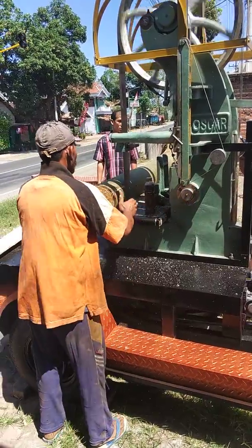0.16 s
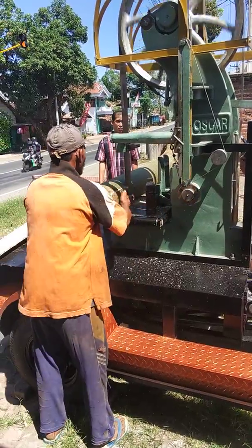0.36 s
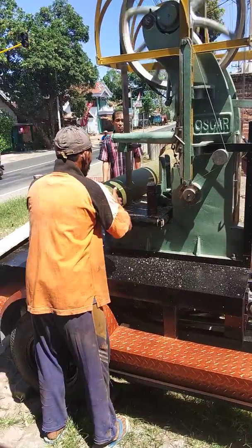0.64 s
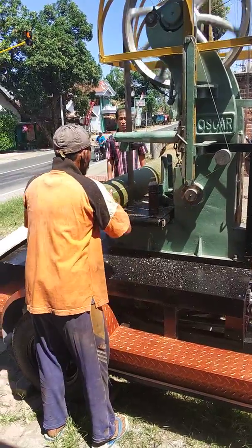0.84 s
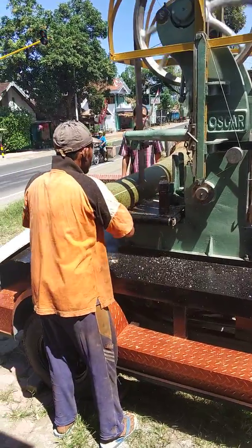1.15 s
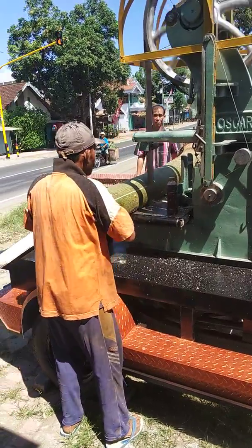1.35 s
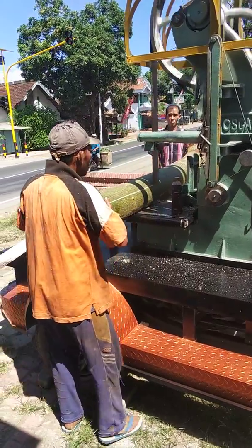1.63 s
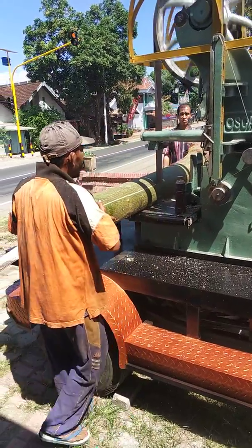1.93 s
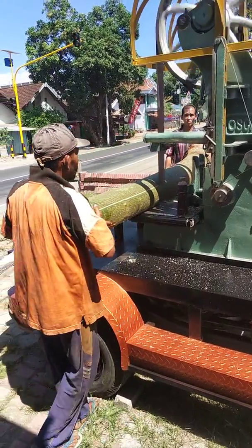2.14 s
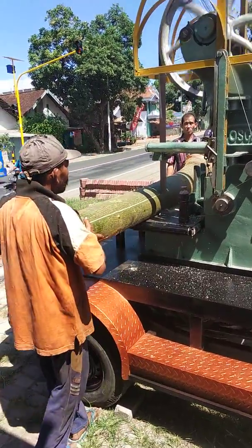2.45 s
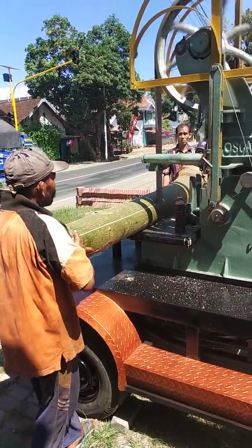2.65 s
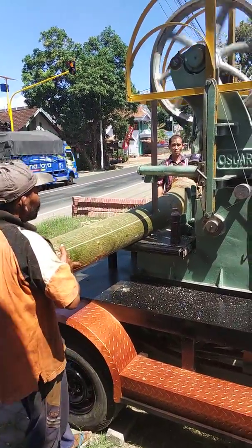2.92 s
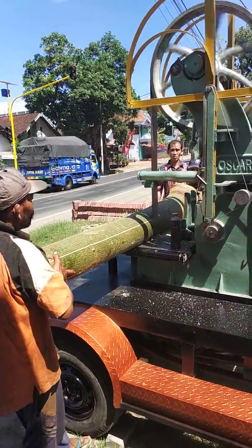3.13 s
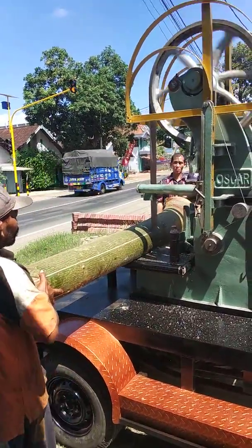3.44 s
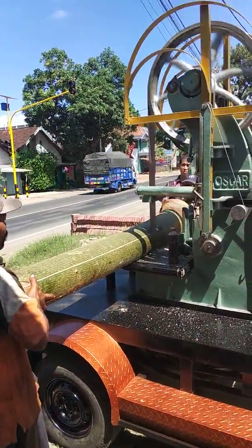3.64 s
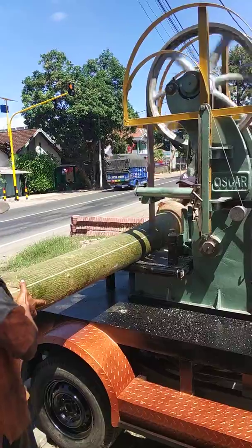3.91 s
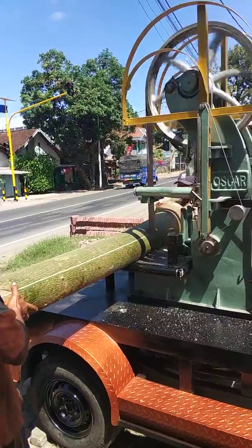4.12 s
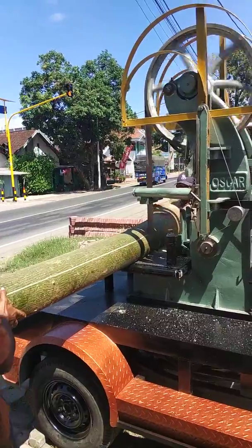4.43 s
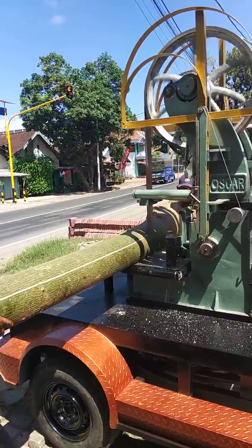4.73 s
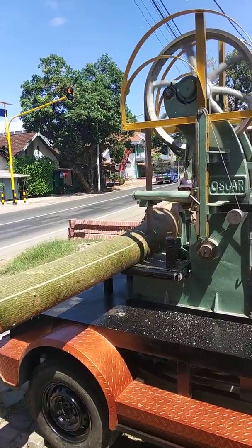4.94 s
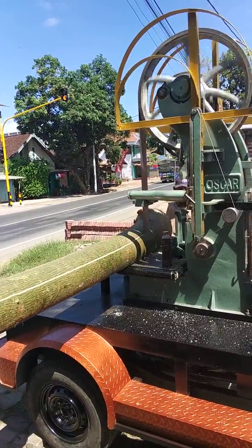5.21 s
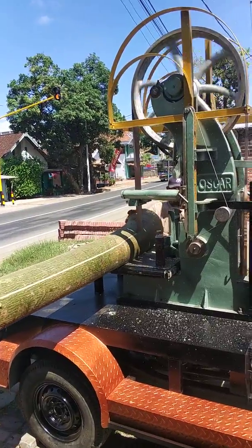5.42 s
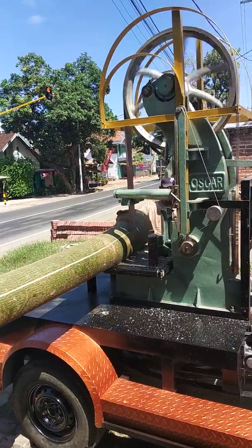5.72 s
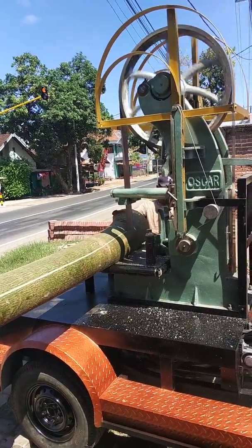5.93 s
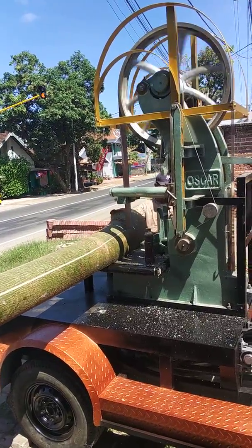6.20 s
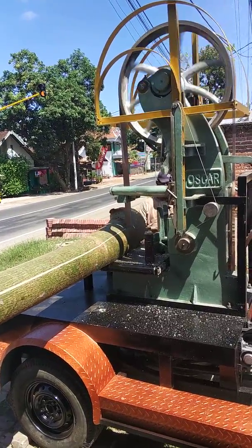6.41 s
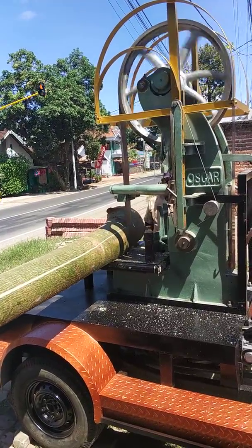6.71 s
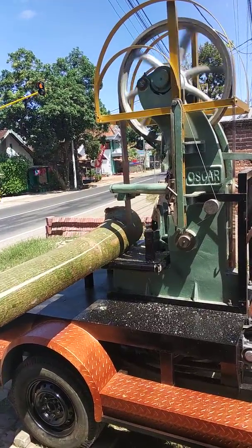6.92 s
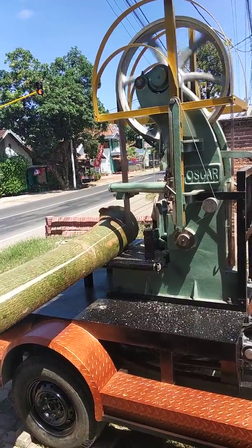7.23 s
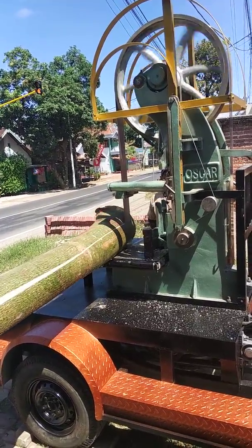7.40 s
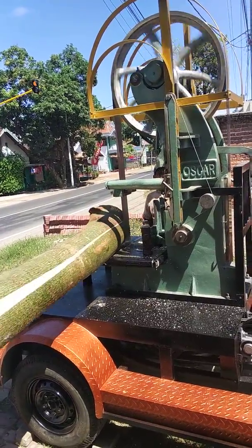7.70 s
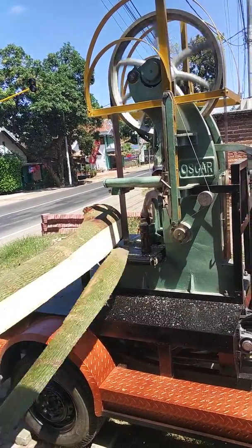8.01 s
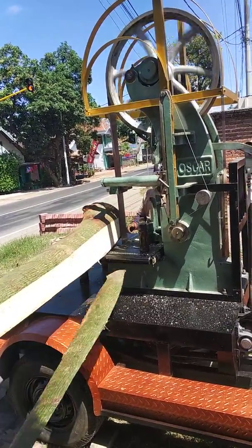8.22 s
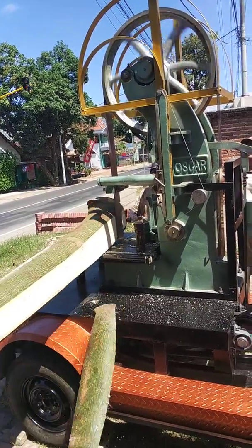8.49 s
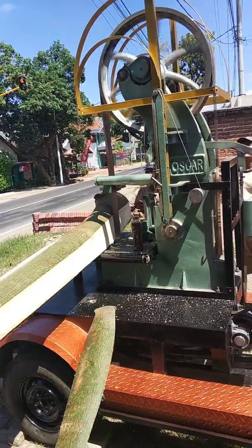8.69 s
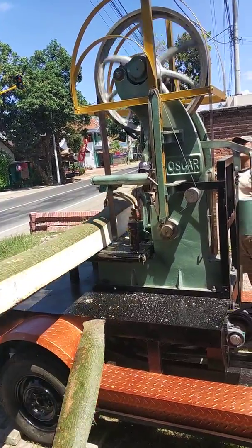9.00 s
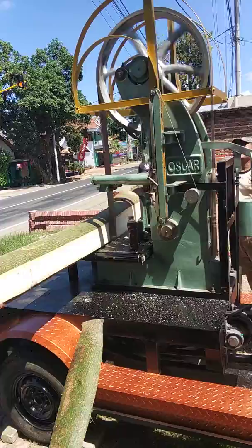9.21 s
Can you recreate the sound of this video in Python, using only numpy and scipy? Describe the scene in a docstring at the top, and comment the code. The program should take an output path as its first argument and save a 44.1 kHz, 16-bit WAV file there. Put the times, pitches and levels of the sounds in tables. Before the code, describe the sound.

A mobile band sawmill rips through a log outdoors, a chugging single-cylinder diesel under a harsh, ringing, hissing rasp of cutting steel.

```python
"""A mobile band sawmill rips a log close to a microphone, for a little over nine seconds.
From the start a single-cylinder diesel chugs ten times a second: pulses excite ducts, blows ring the block.
Wavering lines hum faintly. The diesel drives the band: torn noise rasps, rings, sizzles; tooth pulses whine.
From two seconds on the teeth now and then snatch at tougher wood, and bursts of noise bark in the log.
Near the end the slab comes free: the bite of the teeth drops, the band rubs on and the engine speeds up."""
import sys
import numpy as np
from scipy import signal
from scipy.fft import rfft, irfft, next_fast_len
from scipy.io import wavfile
from scipy.ndimage import uniform_filter1d

SR = 44100
rng = np.random.default_rng(int(sys.argv[2]) if len(sys.argv) > 2 else 0)


def waveform_to_disk(signal):
    """Save audio, clipped to [-1, 1], as 16-bit WAV at the path in sys.argv[1]."""
    frames = np.transpose(np.atleast_2d(signal))
    scaled = np.clip(frames, -1, 1) * 32767
    samples = np.round(scaled).astype(np.int16)
    wavfile.write(sys.argv[1], SR, samples)


N = 412335
TIME = np.arange(N) / SR  # s

# Engine speed, rising when the cut is through: time_s, firing_rate_hz
ENGINE_SPEED = [(0, 10.042), (1.3, 9.992), (3.3, 10.014), (5.2, 10.009), (5.9, 9.972), (6.7, 10.02),
                (7.6, 9.973), (8.5, 10.128), (9.35, 10.138)]
# Gas pulses of exhaust and intake in each cycle: delay_ms after ignition, relative_level_db,
# duct_resonance_hz, width_hz
GAS_PULSES = [(1, -14.5, 201, 69), (10.9, -9, 363, 240), (15.5, -10.5, 555, 150), (30.38, -4, 205, 86),
              (52.52, 1, 243, 203), (56.24, -5, 330, 360), (60.7, -13, 435, 140), (79.46, -6, 240, 205)]
# Loudness of the gas pulses, greatest under the deepest load: time_s, level_db
CHUG_LEVEL = [(0, -32.5), (2.2, -32.5), (6.3, -30.5), (9.35, -31.5)]
# Blows of combustion, piston and valves in each cycle: delay_ms after ignition, relative_level_db
ENGINE_BLOWS = [(2, -2.5), (4.5, -4.5), (9, -6), (13, -1), (22, -4), (37, -3), (50, -21), (60, -13)]
# Loudness of the diesel knock: time_s, crankcase_db, block_db, loose_covers_db
KNOCK_LEVEL = [(0, -31, -33, -29), (1.5, -30.5, -30.5, -33.5), (2.4, -28.5, -31.5, -30),
               (3.2, -34, -31, -32), (4.1, -30.5, -34, -32), (5.5, -34.5, -28.5, -29.5),
               (6.3, -32.5, -27.5, -34), (7, -33.5, -28.5, -38), (7.9, -35.5, -30.5, -28),
               (9.35, -38, -34, -29)]
# Resonances of the long-ringing crankcase: centre_hz, width_hz, relative_gain_db
CRANKCASE_MODES = [(795, 23, 2.5), (838, 16, -2), (895, 27, 2)]
# Resonances of engine block and covers: centre_hz, width_hz, relative_gain_db
BLOCK_MODES = [(440, 34, 0), (564, 46, -5), (624, 40, -8), (930, 41, -1), (997, 77, 2.5), (1094, 37, -9),
               (1208, 32, 0), (1290, 43, 4), (1430, 73, -6), (1720, 40, 0), (2050, 250, -2),
               (2970, 1100, -10.5), (4520, 1600, -16)]
# Spectrum of the clattering covers: frequency_hz, relative_gain_db
CLATTER_SPECTRUM = [(300, -9), (800, -8), (1300, 2.5), (1600, -13), (2300, 7), (3500, -1.5), (5500, -4),
                    (10000, -38.5)]
# Faint wavering lines of the running machine, with the tooth-passing tone at 730 Hz:
# mean_pitch_hz, relative_level_db
HUM_LINES = [(430, -43), (550, -45.5), (636, -43), (730, -51), (845, -42), (1082, -49), (1230, -45)]
# The cut, louder once the slab comes free and the band rubs on: time_s, relative_rasp_db, relative_ring_db
CUT_LEVEL = [(0.05, -22.5, -22), (0.62, -21, -21.5), (2.24, -23.5, -22), (3.17, -22, -21),
             (7.31, -21, -21.5), (7.73, -23.5, -23), (7.86, -19.5, -17), (8.14, -24, -24.5),
             (8.19, -20, -21.5), (8.58, -20.5, -17.5), (9.25, -20, -21.5), (9.3, -22, -16)]
# Spectrum of the torn wood: frequency_hz, relative_gain_db
RASP_SPECTRUM = [(100, -10.5), (200, -5), (500, -7), (900, -3), (1550, -4.5), (2100, -1), (2800, -0.5),
                 (3400, -2.5), (4100, -2.5), (5400, -1), (6300, -7.5), (8200, -6.5), (10000, -6.5),
                 (11200, -46)]
# Resonances of band and saw frame rubbed by the wood: centre_hz, width_hz, relative_gain_db
BAND_MODES = [(1742, 26, 1), (1927, 84, -1), (2008, 46, 3.5), (2101, 50, 5.5), (2190, 56, 2.5),
              (2283, 47, 4.5), (2434, 27, 4), (2523, 27, 0), (2609, 28, 8), (2797, 31, 0), (2930, 54, -15),
              (3220, 46, -20), (3550, 76, -4)]
# Common level of the tooth tips' sizzle and whine: time_s, relative_level_db
TIP_LEVEL = [(0.1, -22), (6.35, -24), (6.43, -31), (6.5, -20.5), (6.55, -23), (7.63, -22), (7.76, -29.5),
             (8.27, -26), (9.3, -25)]
# How firmly the tips bite, as whine against sizzle: time_s, relative_level_db
BITE_LEVEL = [(0, -2.5), (2.5, -3.5), (5, -7.5), (7.62, -7), (7.74, -19), (9.35, -18)]
# Spectrum of the tips' sizzle: frequency_hz, relative_gain_db
SIZZLE_SPECTRUM = [(6000, -26.5), (8000, -14.5), (8700, -0.5), (9000, 0), (9300, 2.5), (9500, 2.5),
                   (9750, -7), (10150, -10), (10450, -12), (11200, -42)]
# Spectrum given to the tooth blows: frequency_hz, relative_gain_db
WHINE_SPECTRUM = [(700, -22), (1500, -11), (3650, -5), (5100, -9.5), (5840, -3.5), (6560, -7.5),
                  (7300, -4.5), (8020, -5), (8750, 1), (9480, 2), (10200, -7.5), (11000, -19.5)]
# Teeth snatching at tougher wood: centre_s, relative_level_db, spread_s (Gaussian)
SNATCHES = [(2.153, -24, 0.013), (3.474, -21, 0.018), (3.777, -22, .02), (4.456, -17.5, .02),
            (6.17, -20, 0.023), (6.277, -19, 0.044), (6.476, -18.5, 0.02), (7.868, -22.5, 0.021),
            (7.97, -18, 0.022), (8.228, -27, .03)]
# Spectrum of the barking log: frequency_hz, relative_gain_db
BARK_SPECTRUM = [(400, -18), (800, -8), (1050, 2.5), (1350, -1), (1600, -2), (2300, 2.5), (3500, -8),
                 (5400, -4), (6500, -21), (10000, -33)]
# Response of the microphone: frequency_hz, gain_db
MICROPHONE_RESPONSE = [(25, -53), (60, -32), (100, -21), (130, -8), (175, -1.5), (400, -0.5)]

FIRST_IGNITION = 0.504  # engine cycles after the start
TEETH_PER_FIRING, TEETH_ON_BAND = 72.85, 167
RASP_DB, STEEL_DB, SIZZLE_DB, WHINE_DB = 3.0, -2.5, -2, 0  # balance of the cutting sounds
RUB_DB, RUB_PHASE = 0.6, 0.37  # harder rubbing once a round: swing in dB, place in the round (0-1)
TOP_HZ = 10950  # upper edge of the microphone's band


def undb(db):
    """Logarithmic level: decibels become an amplitude gain."""
    return 10 ** (np.asarray(db) / 20)


def unit(x):
    """Power normalisation: scale to rms 1."""
    return x / np.sqrt(np.mean(x ** 2))


def curves(table):
    """Linear interpolation: each column of a table becomes a line through time."""
    s, *columns = np.transpose(table)
    return [np.interp(TIME, s, column) for column in columns]


def walk(rate_hz):
    """Low-passed noise: smooth chance of rms 1, changing about rate_hz times a second."""
    k = max(int(SR / rate_hz), 2)
    once = uniform_filter1d(rng.standard_normal(N), k, mode="wrap")
    return unit(uniform_filter1d(once, k, mode="wrap"))


def colour(x, spectrum):
    """Linear filtering: weight each frequency by a spectrum interpolated over log frequency."""
    hz, db = np.transpose(spectrum)
    size = next_fast_len(N)
    f = np.maximum(np.fft.rfftfreq(size, 1 / SR), 1)
    gain = undb(np.interp(np.log(f), np.log(hz), db))
    return irfft(rfft(x, size) * gain, size)[:N]


def resonate(x, hz, width_hz):
    """Simple resonance: a damped mode with gain 1 at its centre."""
    b, a = signal.iirpeak(hz, hz / width_hz, fs=SR)
    return signal.lfilter(b, a, x + 1e-18)


def ring(x, modes):
    """Modal superposition: a body sounds as the sum of its resonances."""
    return sum(undb(db) * resonate(x, hz, width_hz) for hz, width_hz, db in modes)


def strikes(times, sizes, order=6):
    """Band-limited impulses: a windowed sinc places clicks between the samples."""
    at = times[:, None] * SR
    taps = np.floor(at).astype(int) + np.arange(1 - order, order + 1)
    window = np.cos(np.pi * (taps - at) / (2 * order)) ** 2
    shape = sizes[:, None] * np.sinc(taps - at) * window
    inside = (taps >= 0) & (taps < N)
    return np.bincount(taps[inside], shape[inside], N)


def each_cycle(ignitions, ms, db, jitter_ms, scatter_db):
    """Cyclic variation: one blow per engine cycle, never quite the same in time or size."""
    early, strong = rng.standard_normal((len(ignitions), 2)).T
    delay_s = (ms + jitter_ms * early) / 1000
    return strikes(ignitions + delay_s, undb(db + scatter_db * strong))


def chug(ignitions):
    """Duct resonance: exhaust and intake pulses thump in ducts, each rounded by three equal chambers."""
    out = 0
    for ms, db, hz, width_hz in GAS_PULSES:
        gas = each_cycle(ignitions, ms, db, jitter_ms=0.059, scatter_db=1.0)
        for _ in range(3):
            gas = resonate(gas, hz, width_hz)
        out = out + gas / np.sqrt(width_hz)
    level_db, = curves(CHUG_LEVEL)
    return unit(out) * undb(level_db)


def covers_rattle(ignitions, blows, decay_s=0.0087, loose_db=-1):
    """Impact noise: each blow shakes the covers, whose clatter dies away exponentially."""
    shaken = signal.lfilter([1], [1, -np.exp(-1 / (decay_s * SR))], blows)
    # part of the noise repeats from cycle to cycle, part is new
    firings = strikes(ignitions, np.ones(len(ignitions)))
    alike = signal.fftconvolve(firings, rng.standard_normal(SR // 10))[:N]
    return unit(shaken * (unit(alike) + undb(loose_db) * rng.standard_normal(N)))


def knock(ignitions):
    """Structure-borne sound: blows and rattle set crankcase and block ringing, and the covers clatter."""
    blows = sum(each_cycle(ignitions, ms, db, jitter_ms=0.081, scatter_db=1.1) for ms, db in ENGINE_BLOWS)
    rattle = covers_rattle(ignitions, blows)
    case_db, block_db, covers_db = curves(KNOCK_LEVEL)
    # the crankcase answers one blow shortly after ignition, as well as the rattle
    case_blow = unit(each_cycle(ignitions, 5.49, 0, jitter_ms=0.1, scatter_db=2.6))
    case = unit(ring(case_blow + undb(-0.5) * rattle, CRANKCASE_MODES))
    block = unit(ring(unit(blows) + undb(3.5) * rattle, BLOCK_MODES))
    covers = unit(colour(rattle, CLATTER_SPECTRUM))
    return case * undb(case_db) + block * undb(block_db) + covers * undb(covers_db)


def hum(waver_db=3, drift=0.00404):
    """Frequency and amplitude modulation: faint sine lines waver in pitch and level."""
    out = 0
    for hz, db in HUM_LINES:
        phase = 2 * np.pi * np.cumsum(hz * (1 + drift * walk(12.5))) / SR
        level_db = db - 2.5 + waver_db * walk(9.8)
        out = out + np.sqrt(2) * np.sin(phase) * undb(level_db)
    return out


def tearing(grain_db, flicker_db):
    """Modulated noise: wood fibres snap in a dense, uneven stream."""
    return rng.standard_normal(N) * undb(grain_db * walk(860) + flicker_db * walk(47))


def grip(rounds, uneven_db=0.68, rate_hz=11):
    """Contact pressure of wood on steel in dB: it swings once a band round and wavers with the grain."""
    return RUB_DB * np.cos(2 * np.pi * (rounds - RUB_PHASE)) + uneven_db * walk(rate_hz)


def wood_rasp(rasp_db, grip_db):
    """Fracture noise: broadband tearing grows with the grip of the wood."""
    torn = colour(tearing(grain_db=0.3, flicker_db=0.77), RASP_SPECTRUM)
    return unit(torn) * undb(RASP_DB + rasp_db + grip_db)


def band_ring(ring_db, grip_db, grip_gain=1.1, waver_db=1.2):
    """Forced vibration: the tearing noise excites the modes of band and saw frame."""
    level_db = STEEL_DB + ring_db + grip_gain * grip_db + waver_db * walk(12.5)
    steel = ring(tearing(grain_db=1.5, flicker_db=0.5), BAND_MODES)
    return unit(steel) * undb(level_db)


def tooth_blows(teeth, uneven_db=-0.5):
    """Periodic impact: a blow per tooth, its spacing and sharpness errors returning with the band."""
    number = np.arange(int(teeth[-1]))
    place = number % TEETH_ON_BAND
    spacing, sharpness = rng.standard_normal((2, TEETH_ON_BAND))
    spacing = uniform_filter1d(spacing, size=14, mode="wrap")
    spacing = unit(uniform_filter1d(spacing, size=6, mode="wrap"))
    # the band also flutters in the kerf, so no two rounds are alike; errors are in tooth spacings
    times = np.interp(number + 0.02 * spacing[place], teeth + 0.024 * walk(70), TIME)
    return strikes(times, undb(uneven_db * sharpness[place]))


def tooth_tips(teeth, rounds, swing_db=1.3, swing_phase=0.69, patchy_db=1.8):
    """Tooth-passing tone and cutting noise: whine and sizzle rise and fall with each band round."""
    tips_db, = curves(TIP_LEVEL)
    bite_db, = curves(BITE_LEVEL)
    # one stretch of the band bites harder, and sharper patches pass once a round
    patches = unit(rng.standard_normal(size=22))
    patch_place = np.arange(len(patches)) / len(patches)
    round_db = swing_db * np.cos(2 * np.pi * (rounds - swing_phase))
    round_db = round_db + patchy_db * np.interp(rounds, patch_place, patches, period=1)
    sizzle = unit(colour(tearing(grain_db=2.0, flicker_db=0.3), SIZZLE_SPECTRUM)) * undb(SIZZLE_DB)
    whine = unit(colour(tooth_blows(teeth), WHINE_SPECTRUM))
    whine = whine * undb(WHINE_DB + bite_db + 2.1 * walk(24))
    return (sizzle + whine) * undb(tips_db + round_db)


def mottle(x, depth_db, width_hz, life_s, size=2048):
    """Random spectral modulation: narrow bands of the sound swell and fade at random."""
    hop = size // 4
    spectra = signal.stft(x, nperseg=size, noverlap=size - hop)[2]
    swell = rng.standard_normal(spectra.shape)
    # smooth the chance first across frequency, then through time
    for axis, span in enumerate((width_hz * size / SR, life_s * SR / hop)):
        keep = np.exp(-1 / span)
        swell = signal.lfilter([1], [1, -2 * keep, keep ** 2], swell, axis=axis)
    mottled = spectra * undb(depth_db * unit(swell))
    return signal.istft(mottled, nperseg=size, noverlap=size - hop)[1][:N]


def saw(teeth):
    """Sliding contact: the band in the log rasps, rings, sizzles, whines and snatches."""
    rasp_db, ring_db = curves(CUT_LEVEL)
    rounds = teeth / TEETH_ON_BAND
    grip_db = grip(rounds)
    cutting = wood_rasp(rasp_db, grip_db) + band_ring(ring_db, grip_db)
    cutting = cutting + tooth_tips(teeth, rounds) + snatch()
    # narrow bands of the cutting noise swell and fade at random
    return mottle(cutting, depth_db=3.0, width_hz=22.7, life_s=0.014)


def snatch():
    """Transient excitation: short surges of coarse tearing resound in the log."""
    surge = sum(undb(db) * np.exp(-0.5 * ((TIME - s) / spread_s) ** 2) for s, db, spread_s in SNATCHES)
    bark = colour(tearing(grain_db=-0.5, flicker_db=-1.5), BARK_SPECTRUM)
    return unit(bark) * surge


def scene():
    """Kinematic coupling: the engine turns the band through a belt, so one speed times firings and teeth."""
    firing_hz, = curves(ENGINE_SPEED)
    cycles = np.cumsum(firing_hz) / SR
    ignitions = np.interp(np.arange(FIRST_IGNITION, cycles[-1]), cycles, TIME)
    # the engine is already running
    ignitions = np.append(ignitions[0] - 1 / firing_hz[0], ignitions)
    mill = chug(ignitions) + knock(ignitions) + hum() + saw(cycles * TEETH_PER_FIRING)
    return np.array([mill, mill])


def record(dry):
    """Transducer response: the microphone sheds deep bass, rounds the highest peaks and cuts the top."""
    thin = np.array([colour(channel, MICROPHONE_RESPONSE) for channel in dry])
    # soft saturation towards 0.85 of full scale
    rounded = thin / (1 + (thin / 0.85) ** 6) ** (1 / 6)
    low_pass = signal.ellip(12, 0.2, 100, TOP_HZ, fs=SR, output="sos")
    return signal.sosfilt(low_pass, rounded)


dry = scene()
out = record(dry)
waveform_to_disk(out)
```